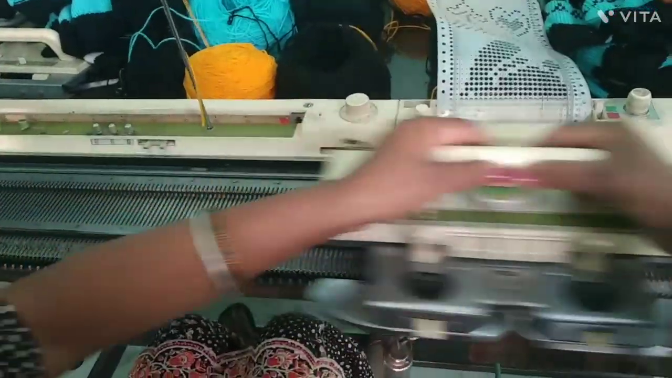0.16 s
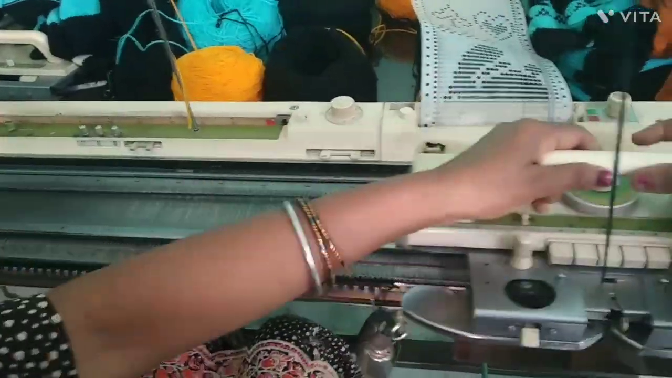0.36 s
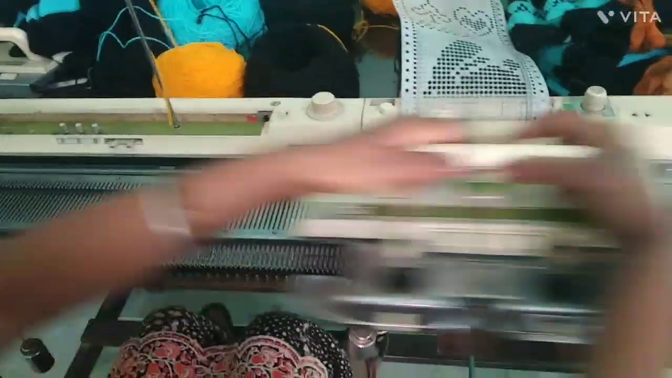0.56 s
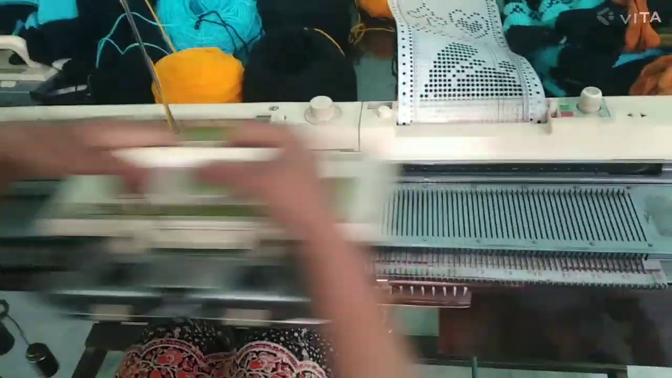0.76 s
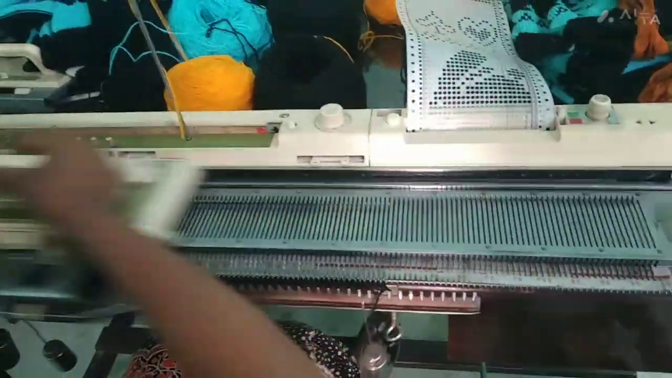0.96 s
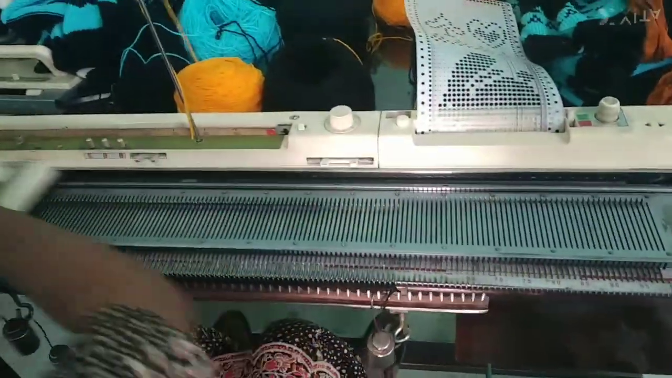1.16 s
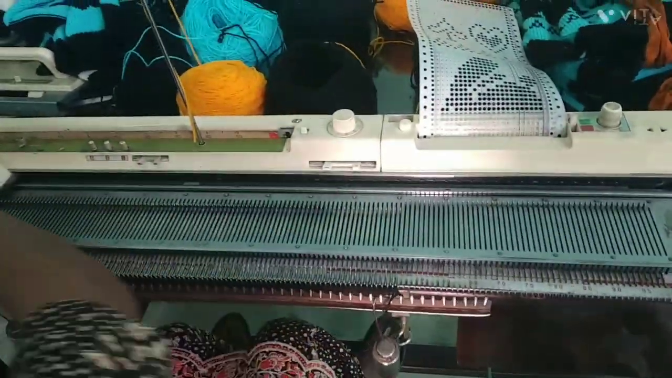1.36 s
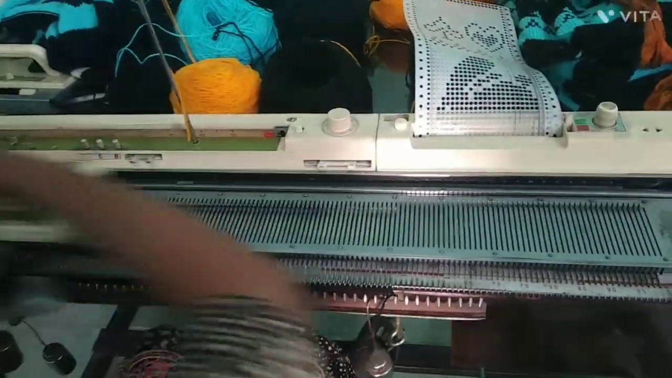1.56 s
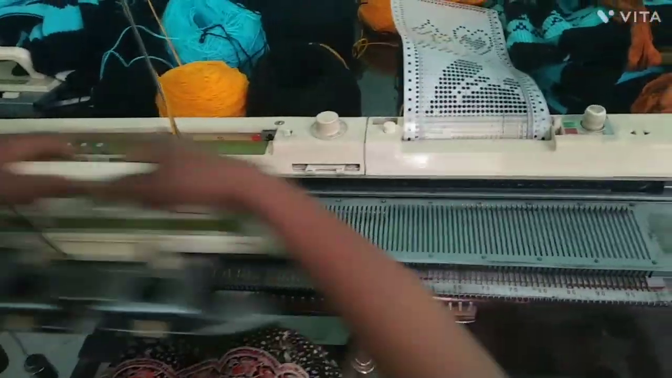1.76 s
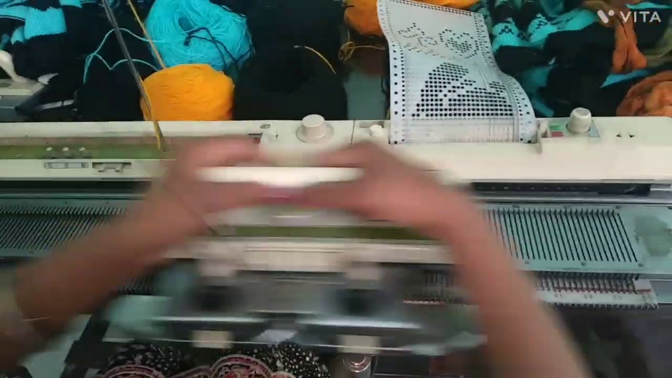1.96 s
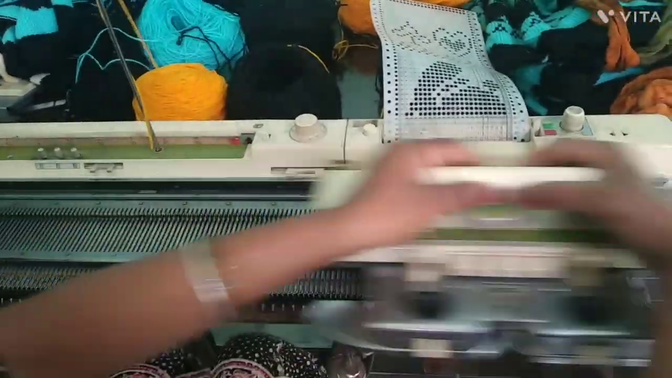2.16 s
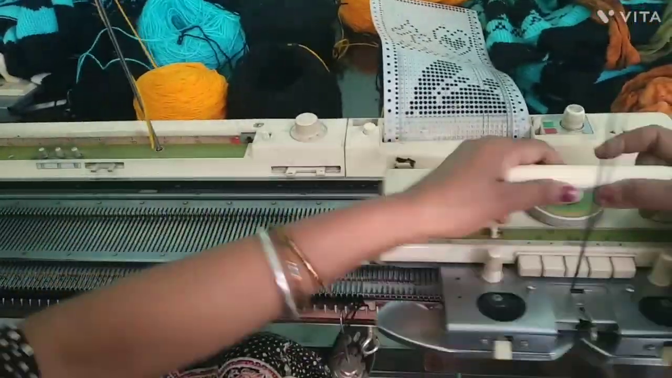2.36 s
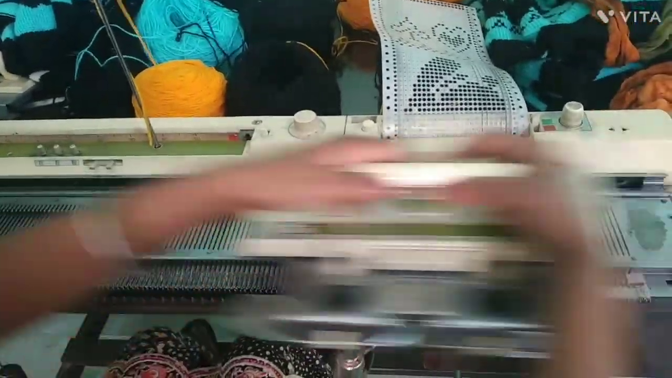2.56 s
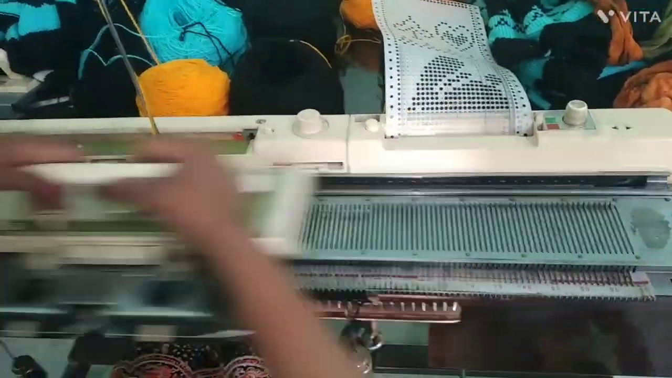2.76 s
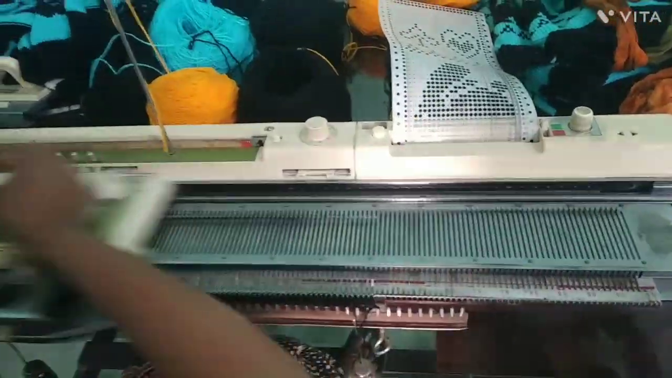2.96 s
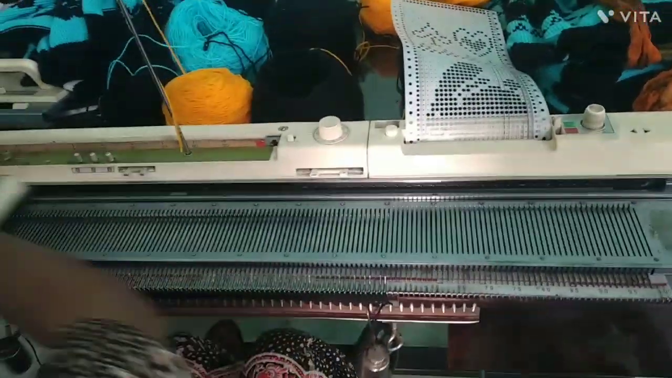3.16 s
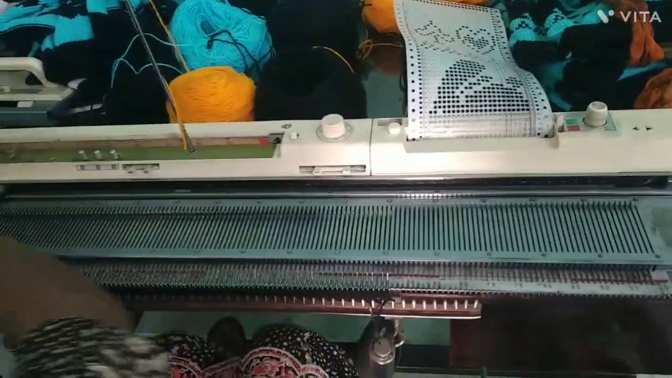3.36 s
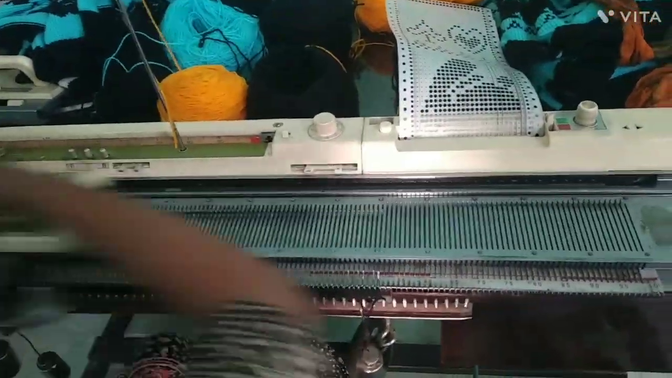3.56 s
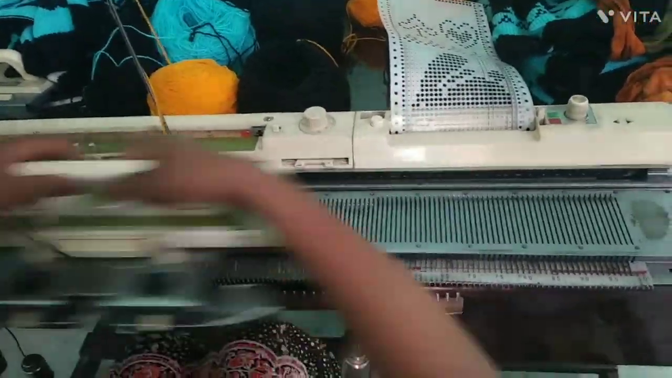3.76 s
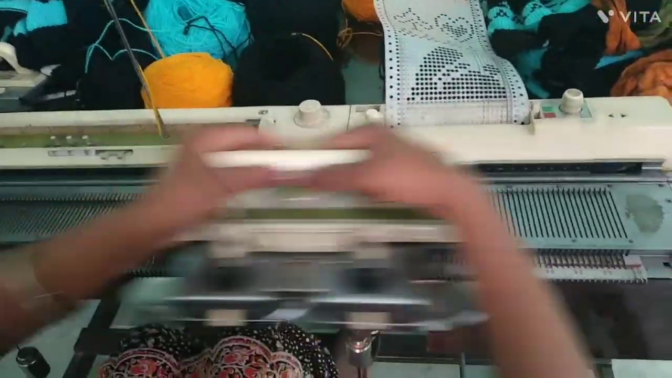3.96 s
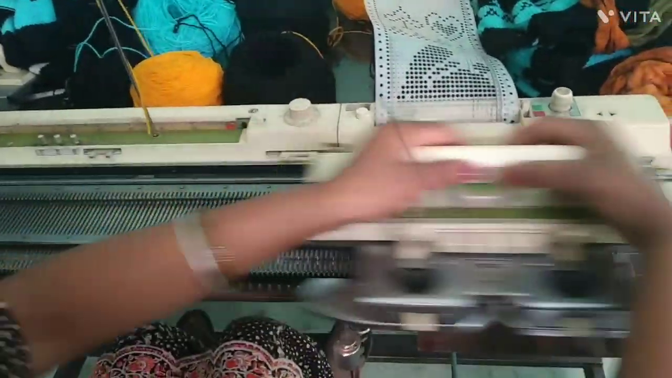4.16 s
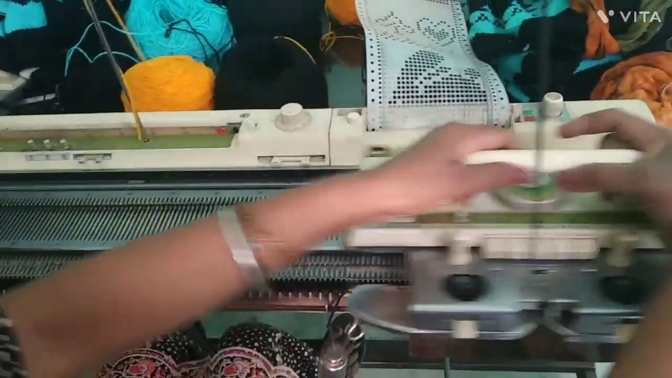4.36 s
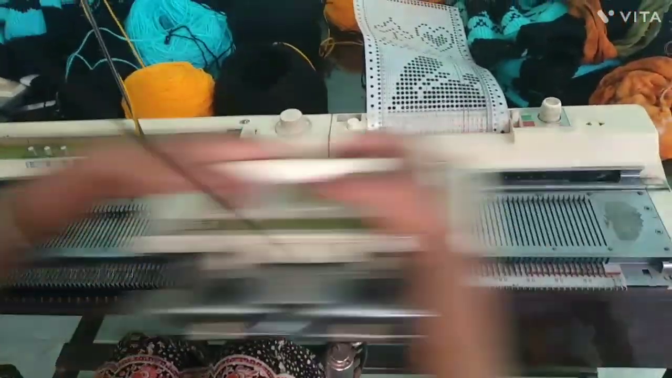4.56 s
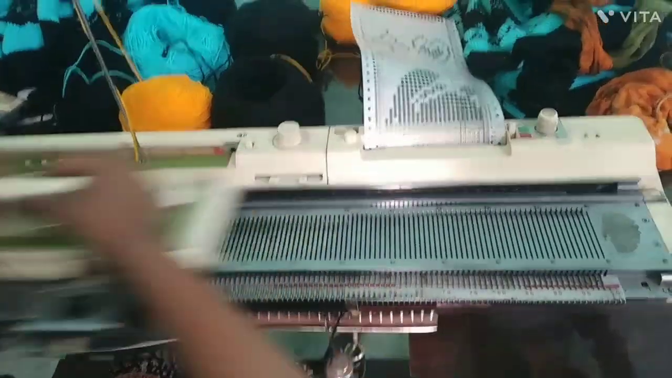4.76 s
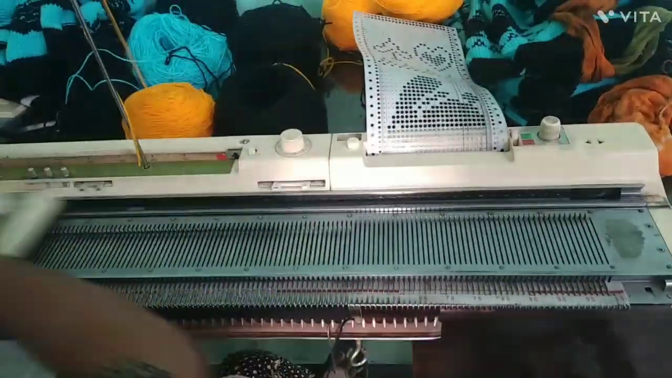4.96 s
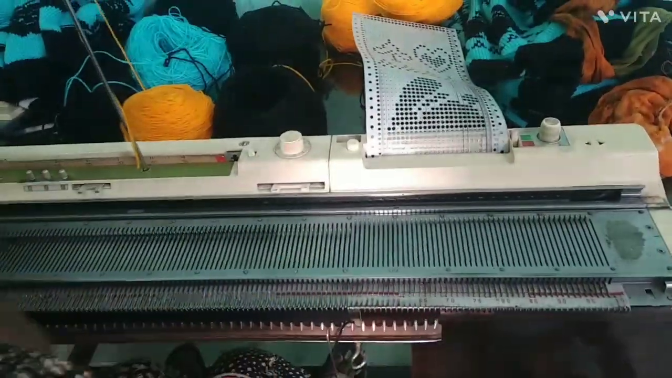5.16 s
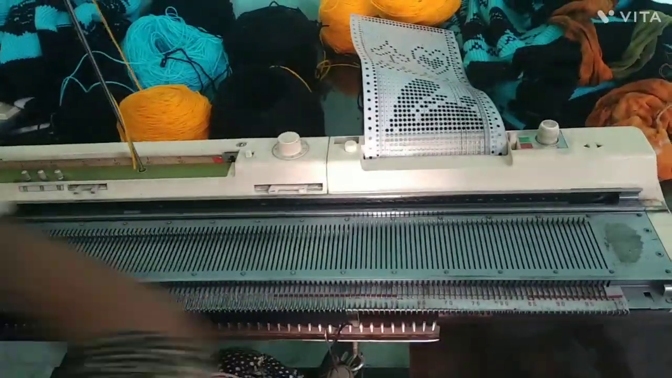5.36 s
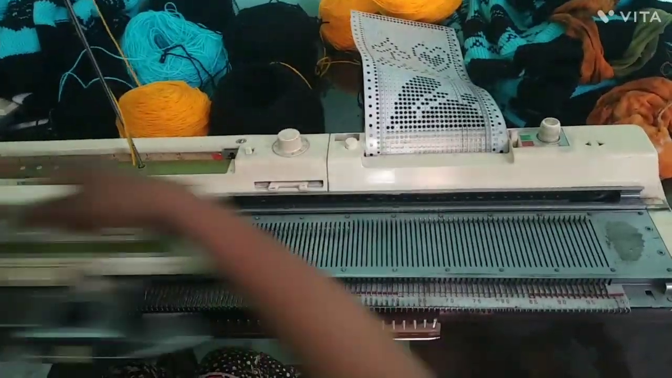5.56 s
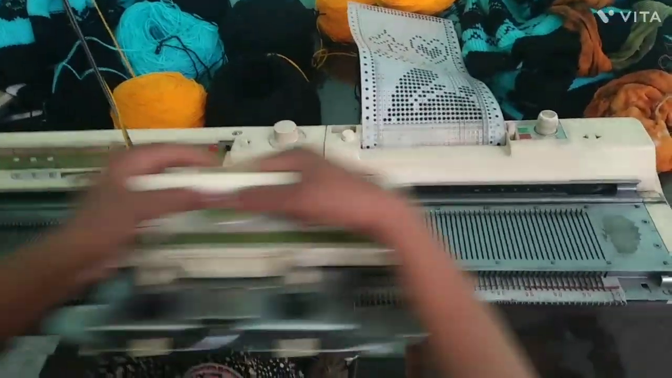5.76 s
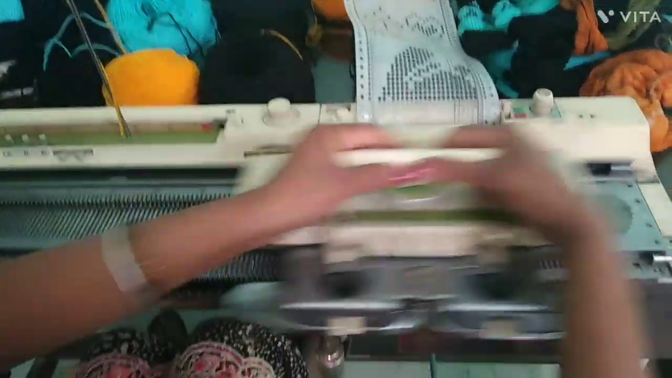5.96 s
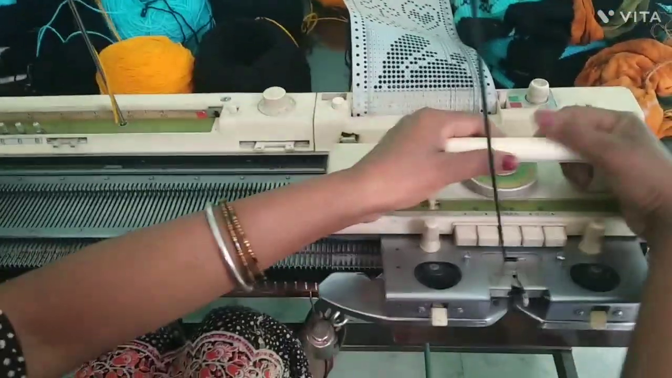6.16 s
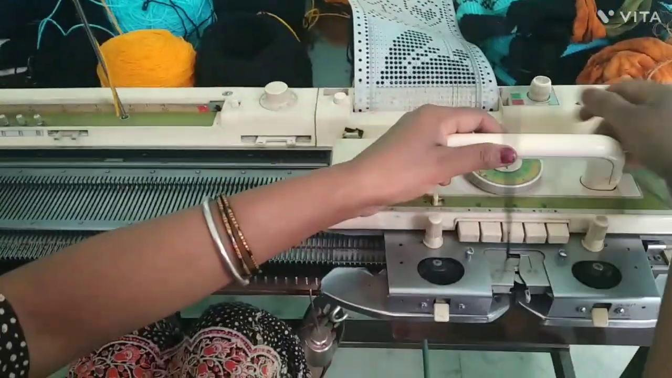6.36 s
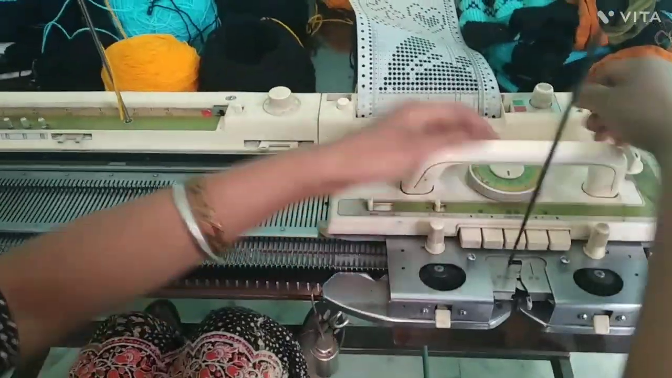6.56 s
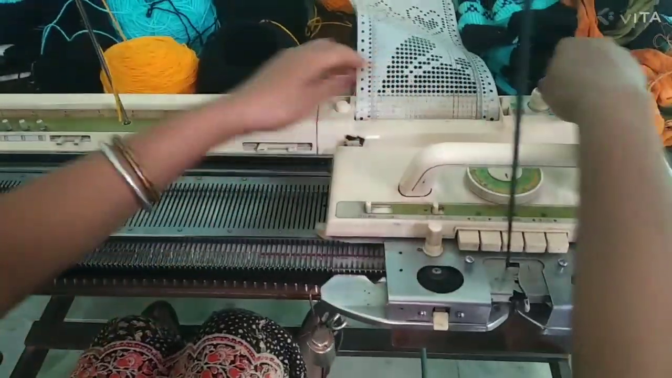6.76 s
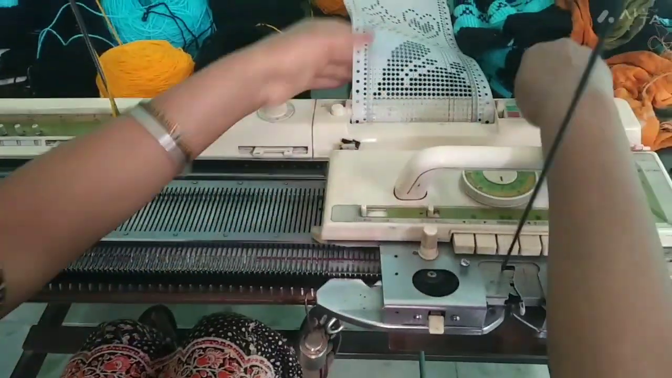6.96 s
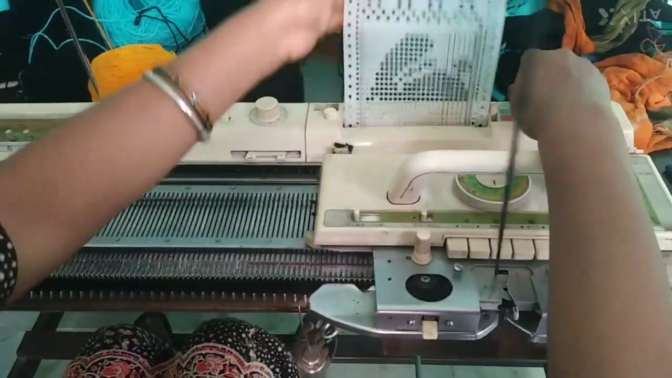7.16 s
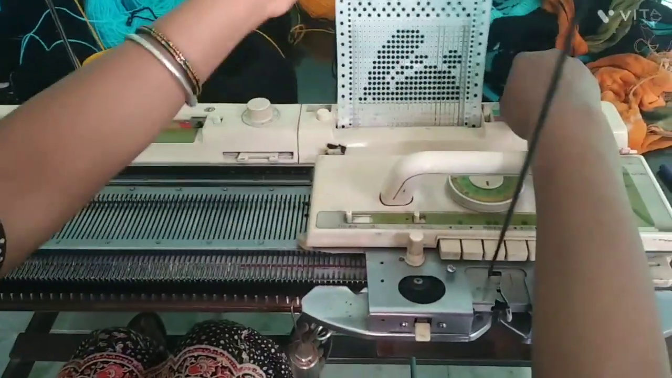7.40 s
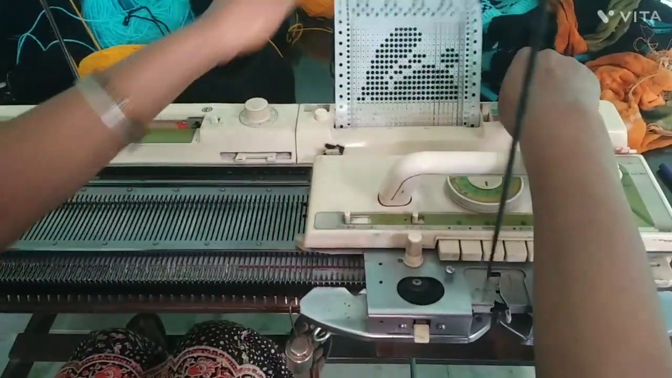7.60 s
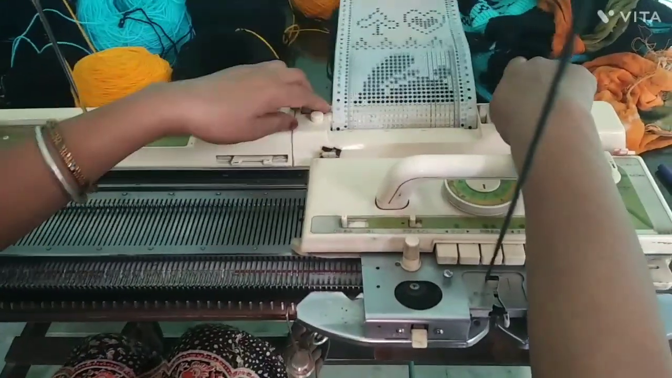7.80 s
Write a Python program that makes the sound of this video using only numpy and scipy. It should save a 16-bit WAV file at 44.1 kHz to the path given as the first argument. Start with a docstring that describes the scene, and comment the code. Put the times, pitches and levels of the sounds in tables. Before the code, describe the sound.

Seven rattling, hissing sweeps of a hand-pushed knitting machine, with lever clicks at the turns, then a faint rustle of card.

```python
"""A bright clicking hiss sweeps to and fro, over a rattle and a purr that sinks as each push slows.
It is a knitting machine in a small room: the cams of the hand-pushed carriage flick about 270 steel
needles a second. The blows shake the carriage plates and the bed; their even spacing makes the purr.
The table judders and levers click at the turns. Once the carriage rests, a soft hiss dies away after
a late click and the punched card is handled lightly."""
import sys
import numpy as np
from scipy import signal
from scipy.fft import rfft, irfft
from scipy.io import wavfile
from scipy.ndimage import uniform_filter1d

SR = 44100
rng = np.random.default_rng(int(sys.argv[2]) if len(sys.argv) > 2 else 0)


def wrap_up_sound(samples):
    """Save the sound to the file named by the first command line argument, as 16-bit audio."""
    columns = np.atleast_2d(samples).T
    # keep every value between -1 and 1, then stretch to whole-number steps
    tamed = np.clip(columns, -1, 1)
    steps = np.round(tamed * 32767).astype(np.int16)
    wavfile.write(sys.argv[1], SR, steps)


N = 345347
TIME = np.arange(N) / SR
CAM_RISE_S = .0048

# Pushes, right and left in turn. Each row: cam bite in seconds, creep before it in seconds; second cam,
# end of run-up and let-go in seconds after it; let-go softness in seconds; base force, creep force and
# purr offset in dB.
PUSHES = [(-.5, 0.025, .04, 0.072, 0.54, 0.042, -21.5, -60, 1),
          (.462, 0.071, .063, 0.091, .67, 0.045, -20, -43, 1),
          (1.552, .036, 0.13, 0.089, .55, 0.039, -20, -48, 1),
          (2.49, 0.05, 0.086, .12, 0.65, 0.065, -19, -43, 1),
          (3.545, .03, .059, 0.082, .6, .045, -19.5, -49, -0.5),
          (4.498, .04, 0.091, .1, .61, 0.039, -19.5, -42.5, 1.5),
          (5.507, .038, .032, .072, .54, .047, -19.5, -45, 1),
          (6.384, 0.046, 0.056, 0.089, .62, 0.055, -19.5, -41, 1.5)]


def gain_of(db):
    """Decibels to amplitude."""
    return 10 ** (np.asarray(db) / 20)


def unit_rms(x):
    """Scales to an rms of one."""
    return x / np.sqrt(np.mean(x ** 2) + 1e-20)


def lookup(points, hz):
    """Interpolates rows of (Hz, value) on a log-frequency axis."""
    f, value = np.transpose(points)
    return np.interp(np.log(hz + 1), np.log(f + 1), value)


def wander(rate_hz, hop=32):
    """Smooth random drift of unit rms, rolled off above rate_hz."""
    t = TIME[::hop]
    hz = np.fft.rfftfreq(len(t), hop / SR)
    slow = irfft(rfft(rng.standard_normal(len(t))) / (1 + (hz / rate_hz) ** 4), len(t))
    return unit_rms(np.interp(TIME, t, slow))


def coloured(x, spectrum, size=4096):
    """Minimum-phase filter of unit energy, shaped by rows of (Hz, dB)."""
    hz = abs(np.fft.fftfreq(size, 1 / SR))
    log_gain = np.log(gain_of(np.maximum(lookup(spectrum, hz), -100)))
    taps = np.fft.ifft(np.exp(np.conj(signal.hilbert(log_gain)))).real[:size // 2]
    return signal.oaconvolve(x, taps / np.linalg.norm(taps))[:N]


def swells(rows, height):
    """Sum of Gaussian bumps; `height` maps each row's dB to its peak."""
    return sum(height(db) * np.exp(-np.minimum(((TIME - centre_s) / width_s) ** 2, 50))
               for centre_s, db, width_s in rows)


def ringing(t60_s, ring_db):
    """Impulse response of a metal part: the blow, then dense, dying modes."""
    t = TIME[:SR // 6]
    modes = (rng.standard_normal(len(t)) * gain_of(-60 * t / t60_s))[t < t60_s]
    taps = gain_of(ring_db) * modes / np.linalg.norm(modes)
    taps[0] += 1
    return taps / np.linalg.norm(taps)


def along_bed(x, travel, response, count, group):
    """Each `group` needles sound from their own place: crossfades through `count` responses."""
    responses = [response() for _ in range(count)]
    place, out = travel / group, np.zeros(N)
    for k in range(int(place[-1]) + 2):
        a, b = np.searchsorted(place, [k - 1, k + 1])
        fade = np.sqrt(1 - abs(place[a:b] - k))
        part = signal.fftconvolve(x[a:b] * fade, responses[k % count])[:N - a]
        out[a:a + len(part)] += part
    return out


def stroke(leftward, speeds, bite_s, creep_s, cam_s, run_up_s, let_go_s, soft_s,
           base_db, creep_db, purr_offset_db):
    """One push: the carriage creeps as slack is taken up, the cams bite, it runs up, slides and coasts."""
    catch_db_per_s, release_db_per_s, purr_release_db_per_s = 1200, 177, 165.5
    usual_hz, force_db_per_octave, coast_decay_s = 280.75, 9, .21
    t = TIME - bite_s
    to_go = np.clip(1 - t / run_up_s, 0, 1)  # share of the run-up ahead
    slid = np.clip((t - run_up_s) / (let_go_s - run_up_s), 0, 1)  # share of the slide done
    coast_s = soft_s * np.logaddexp(0, (t - let_go_s) / soft_s)
    braking_s = np.maximum(TIME - speeds[-1][0], 0)
    pace_hz = np.interp(TIME, *np.transpose(speeds))
    speed_hz = pace_hz * (1 - .35 * to_go ** 2) * np.exp(-braking_s / coast_decay_s)

    before_bite_db = catch_db_per_s * np.maximum(-t, 0)
    one_cam_db = .5 * np.clip((cam_s - t) / CAM_RISE_S, 0, 1)  # weaker until the second cam engages
    pace_db = force_db_per_octave * np.log2(pace_hz / usual_hz)  # faster strikes harder
    drive_db = base_db + pace_db - one_cam_db - 17.5 * to_go ** 1.68
    slack_db = creep_db - catch_db_per_s * np.maximum(-t - creep_s, 0)
    force_db = np.maximum(drive_db - before_bite_db, slack_db) - release_db_per_s * coast_s

    # The purr sets in near full speed, builds, then sags along the slide.
    onset_db = before_bite_db + 50 * to_go + 6 * np.maximum(1 - slid / .22, 0)
    sag_db = 9 * slid + purr_release_db_per_s * coast_s
    purr_db = -45 + purr_offset_db - onset_db - sag_db
    leftness = slid if leftward else 1 - slid
    return np.array([force_db, speed_hz, leftness, purr_db])


def carriage_motion():
    """Chains the pushes: each takes over once its force passes that of the last."""
    # One list per push. Each point: time in seconds, pace in needles per second.
    speeds = [
        [(0, 260), (.08, 224)],
        [(.55, 285), (.7, 262), (.8, 245), (.93, 236), (1.03, 217), (1.15, 184)],
        [(1.65, 353), (1.8, 296), (1.96, 267), (2.1, 247)],
        [(2.62, 295), (2.77, 261), (2.86, 266), (3.04, 220), (3.16, 183)],
        [(3.66, 322), (3.84, 260), (3.93, 244), (4.07, 235), (4.14, 211)],
        [(4.6, 302), (4.74, 267), (4.89, 253), (4.98, 260), (5.07, 228), (5.15, 213)],
        [(5.61, 354), (5.72, 315), (5.8, 294), (5.87, 260), (5.97, 264), (6.07, 234)],
        [(6.47, 316), (6.56, 306), (6.66, 254), (6.81, 252), (6.95, 220), (7.02, 217)],
    ]
    controls = stroke(False, speeds[0], *PUSHES[0])
    for k in range(1, len(PUSHES)):
        new = stroke(k % 2 == 1, speeds[k], *PUSHES[k])
        controls = np.where(new[0] > controls[0], new, controls)
    return controls


def snags():
    """Force change in dB where the cams catch on tight needles: a quick rise that eases off."""
    # Each row: start in seconds, force change in dB, easing time in seconds.
    catches = [(.165, 9.5, 0.023), (.405, 3, 0.012), (1.16, 4.5, 0.029), (1.62, -0.5, 0.055),
               (2.49, 6.5, 0.013), (3.16, 6, 0.15), (3.645, 2, 0.023), (4.2, 7, 0.015)]
    return sum(db * np.clip((TIME - start_s) / CAM_RISE_S, 0, 1) * np.exp(-abs(TIME - start_s) / ease_s)
               for start_s, db, ease_s in catches)


def needle_blows(travel, scatter_s, uneven_db, scrape_db, cams=5):
    """Each needle meets several cams, a little early or late; between blows the carriage scrapes."""
    blows = np.zeros(N)
    for cam_offset in rng.random(cams):
        at = np.flatnonzero(np.diff(np.floor(travel + cam_offset)))
        late, force = rng.standard_normal((len(at), 2)).T
        at = np.clip(at + np.round(late * scatter_s * SR).astype(int), 0, N - 1)
        np.add.at(blows, at, gain_of(uneven_db * np.minimum(force, 1)) * rng.choice([-1, 1], len(at)))
    drive = unit_rms(blows) + gain_of(scrape_db) * rng.standard_normal(N)
    running_rms = np.sqrt(abs(uniform_filter1d(drive ** 2, size=4096)) + 1e-9)
    return drive / running_rms  # at low speed the scrape takes over


def needles(blows, travel, force_db):
    """Thin steel needles and latches ring briefly in the high treble; every few have their own colour."""
    # Each row: frequency in Hz, relative level in dB.
    steel_spectrum = [(2800, -40), (4500, -18), (5600, -13.5), (7000, -9), (8700, -5.8), (9600, -1.6),
                      (11000, 0), (12000, -1.4), (14000, -5.7), (15700, -10.5)]
    rings = along_bed(blows, travel, lambda: ringing(t60_s=.016, ring_db=4.5), count=200, group=3)
    return unit_rms(coloured(rings, steel_spectrum)) * gain_of(force_db - 1 + .43 * wander(22))


def rattle_drive(force_db, leftness):
    """Rattle gain in dB: rises with force, at mid-bed where the bed gives most, and as the hands lean."""
    # Hands leaning on the carriage. Each row: centre in seconds, rattle change in dB, width in seconds.
    leans = [(.69, 3, .06), (1.79, 0, .06), (2.62, 0.5, .035), (5.76, -0.5, .06)]
    return .77 * (force_db + 17) + .5 * np.sin(np.pi * leftness) + swells(leans, float)


def carriage_plates(blows, travel, level_db):
    """The needle blows rattle the plates and cover of the carriage."""
    # Each row: frequency in Hz, relative level in dB.
    plate_spectrum = [(250, -29.5), (400, -6), (600, -8.5), (760, -1), (1100, -2), (1400, -2.5), (1900, -5),
                      (2400, -2), (2850, -1), (3600, -5.5), (4500, -9), (5400, -2), (7000, -37),
                      (11000, -54.5)]
    rings = along_bed(blows, travel, lambda: ringing(t60_s=.028, ring_db=9.5), count=150, group=4)
    return unit_rms(coloured(rings, plate_spectrum)) * gain_of(level_db + .4 * wander(30))


def treble_chatter(travel, tone_db, low_hz=2700, high_hz=6900, t60_s=.12, max_onsets=2400, tones=2):
    """Brief tones at random treble pitches: a metallic shimmer that follows the rattle."""
    t = TIME[:SR // 8]
    decay = gain_of(-60 * t / t60_s)
    out = np.zeros(N + len(t))
    onsets = np.flatnonzero(np.diff(np.floor(travel)))
    pitches_hz = rng.uniform(low_hz, high_hz, (max_onsets, tones, 1))
    for at, hz in zip(onsets, pitches_hz):
        out[at:at + len(t)] += gain_of(tone_db[at]) * decay * np.sin(2 * np.pi * hz * t).sum(0)
    return out[:N]


def bed_rumble(blows, level_db):
    """The long bed and its table rumble in a few low resonances."""
    # Each row: frequency in Hz, relative level in dB.
    bed_spectrum = [(30, -35), (70, -11), (100, -4.5), (128, 3.5), (155, -4), (185, 1.5), (230, -2.5),
                    (290, 1.5), (380, -1.5), (480, -10.5), (650, -5), (1100, -47)]
    return unit_rms(coloured(blows, bed_spectrum)) * gain_of(level_db)


def purr(travel, speed_hz, level_db):
    """Evenly spaced needles give a tone that follows the speed; harmonics swell at frame resonances."""
    # Response of the frame. Each row: frequency in Hz, gain in dB.
    frame_response = [(80, 0), (130, 2), (180, 0), (220, -4), (245, -6), (272, 3), (300, -3), (340, -7.5),
                      (430, -5), (540, -12), (650, -12), (790, -8.5), (880, -8), (960, -5.5), (1040, -3.5),
                      (1140, -6.5), (1400, -9.5), (1600, -16)]
    # Offsets in dB for harmonics 1 to 5 of the needle rate.
    harmonics_db = [0, 0, -2.5, 0, -2.5]
    # Whine of harmonics 3 to 5. Each row: centre in seconds, base level in dB, width in seconds.
    whines = [(.03, -41, .06), (.89, -39.5, .09), (1.06, -40, .06), (1.8, -38.5, .1), (2.01, -40, .1),
              (2.84, -39, .12), (3.08, -38.5, .055), (3.86, -37, .11), (4.04, -39, .08), (4.76, -41.5, .09),
              (4.98, -43, .07), (5.67, -39.5, .07), (5.84, -38.5, .12), (6.63, -39.5, .06),
              (6.81, -42, .08)]
    purr_gain, whine_gain = gain_of(level_db), swells(whines, gain_of)
    cycles = travel + .035 * wander(20)
    tone = np.zeros(N)
    for k, harmonic_db in enumerate(harmonics_db, 1):
        phase = k * cycles + .014 * k * wander(60)  # upper harmonics are rougher
        gain = gain_of(harmonic_db + lookup(frame_response, k * speed_hz) + 3 * wander(30))
        tone += gain * (purr_gain if k < 3 else whine_gain) * np.cos(2 * np.pi * phase)
    return tone * np.clip(speed_hz / 200, 0, 1) ** 3  # a slow carriage hardly sings


def table_judders():
    """The table judders as the carriage runs off the last needles, and less as it turns round."""
    # Each row: centre in seconds, level in dB, width in seconds.
    judders = [(0.079, -53, 0.047), (0.409, -77, 0.042), (1.17, -46.5, 0.054), (2.14, -43, 0.047),
               (2.44, -58.5, 0.029), (3.15, -47, 0.1), (4.165, -42.5, 0.049), (4.41, -57, 0.049),
               (5.15, -50.5, 0.092), (6.075, -44.5, 0.05), (6.33, -59, 0.038), (7.01, -49, 0.054)]
    spectrum_hz_db = [(80, -41), (125, -5.5), (165, .5), (210, -6), (280, -13.5), (420, -13), (800, -57)]
    return swells(judders, gain_of) * coloured(rng.standard_normal(N), spectrum_hz_db)


def table_boom(jolts, slide_db, jolt_db, hz, t60_s):
    """One low mode of the table, fed by sliding and jolts, hums on as the carriage slows."""
    t = TIME[:SR]
    mode = np.sin(2 * np.pi * hz * t) * gain_of(-60 * t / t60_s)
    drive = gain_of(slide_db) * rng.standard_normal(N) + gain_of(jolt_db) * jolts
    return signal.oaconvolve(drive, mode / np.linalg.norm(mode))[:N]


def clicks_and_ticks(rise_s=.0016, decay_s=.003):
    """Levers chatter as they snap over, and a few single needles tick as the carriage slows; each gives a
    bright ring and a dull knock in the frame."""
    # Each row: start in seconds, ring and knock in relative dB.
    snaps = [(0.334, -34, -60), (.375, -39, -55), (1.512, -36, -51), (2.42, -34.5, -60), (2.43, -29, -56.5),
             (3.457, -40.5, -67), (3.464, -38, -67), (3.497, -44, -53), (3.521, -34.5, -52),
             (4.406, -36, -68), (4.411, -35, -58), (4.442, -38, -57), (4.452, -25.5, -59.5),
             (5.379, -37, -59), (5.466, -42.5, -56), (5.488, -35, -52), (6.267, -37, -65),
             (6.277, -35, -62), (6.303, -32, -60), (6.312, -26.5, -55.5), (6.334, -24.5, -53),
             (7.4, -48.5, -42.5), (7.815, -44, -59)]
    # Each row of both spectra: frequency in Hz, relative level in dB.
    ring_spectrum = [(1000, -35), (3000, -25), (6000, -8), (9000, -2), (11000, 3), (13000, -2), (16000, -9)]
    knock_spectrum = [(40, -11), (130, 2.5), (300, 0), (600, 0), (1500, -1), (2100, 10), (2700, 5),
                      (3300, 8), (4400, 2), (5500, 10), (6600, -8), (14000, -6)]
    t = TIME[:SR // 20]
    envelope = np.minimum(t / rise_s, 1) * np.exp(-t / decay_s)
    bright, dull = np.zeros((2, N + len(t)))
    for start_s, ring_db, knock_db in snaps:
        chatter = envelope * rng.standard_normal(len(t))
        chatter /= np.linalg.norm(chatter)
        at = round(start_s * SR)
        bright[at:at + len(t)] += gain_of(ring_db) * chatter
        dull[at:at + len(t)] += gain_of(knock_db) * chatter
    clicks = coloured(bright, ring_spectrum) + coloured(dull, knock_spectrum)
    return gain_of(13) * signal.oaconvolve(clicks, ringing(t60_s=.16, ring_db=-7))[:N]


def noise_bursts(rows, spectrum, rise_s=.0077):
    """Coloured noise in bursts that start quickly and die away."""
    envelope = np.zeros(N)
    for start_s, db, decay_s in rows:
        t = TIME - start_s
        envelope += gain_of(db) * np.clip(t / rise_s, 0, 1) * np.exp(-abs(t) / decay_s)
    return envelope * coloured(rng.standard_normal(N), spectrum)


def soft_hiss():
    """A soft hiss dies away after the late click, then a faint rustle follows."""
    # Each row: start in seconds, level in dB, decay time in seconds.
    bursts = [(7.398, -67, 0.16), (7.768, -68, 0.12)]
    # Each row: frequency in Hz, relative level in dB.
    hiss_spectrum = [(200, 12), (1000, 13), (1450, 4), (2000, 4.5), (2600, 6), (3500, 8), (5600, 4),
                     (6600, 3), (11000, 15.5), (15000, -7)]
    return noise_bursts(bursts, hiss_spectrum)


def card_rustles():
    """The punched pattern card rustles as a hand turns it."""
    # Each row: start in seconds, level in dB, decay time in seconds.
    rustles = [(7.49, -68, 0.017), (7.562, -66.5, 0.021), (7.79, -69, .05)]
    # Each row: frequency in Hz, relative level in dB.
    card_spectrum = [(200, -7.5), (700, -2), (1200, -2), (1700, -11), (2400, -13), (7000, -17),
                     (14000, -22)]
    return noise_bursts(rustles, card_spectrum)


def room_air(level_db):
    """Still air of the room: faint, steady, mostly low noise."""
    # Each row: frequency in Hz, relative level in dB.
    air_spectrum = [(20, 6), (45, 15), (100, 2), (250, -12.5), (600, -28), (2000, -27.5), (10000, -19.5),
                    (16000, -36)]
    return gain_of(level_db) * coloured(rng.standard_normal(N), air_spectrum)


def room_tail():
    """Diffuse room response of unit energy; the treble dies first."""
    # Each row: frequency in Hz, T60 in seconds.
    decay_times = [(125, 0.93), (500, 0.75), (1000, 0.68), (2000, 0.61), (6000, 0.41), (11000, 0.29),
                   (16000, 0.18)]
    hz, t, noise = signal.stft(rng.standard_normal(SR // 2), SR, nperseg=256)
    decay = gain_of(-60 * t / lookup(decay_times, hz)[:, None])
    taps = signal.istft(noise * decay, SR)[1]
    return taps / np.linalg.norm(taps)


def scene():
    """The machine in its room, the same in both channels."""
    stroke_db, speed_hz, leftness, purr_db = carriage_motion()
    push_db = stroke_db + snags()
    held = TIME < PUSHES[-1][0]
    force_db = np.where(held, np.maximum(push_db, -61.5), push_db)  # still rattles between pushes
    speed_hz = speed_hz * (1 + .007 * wander(9))  # hands never push quite evenly
    travel = np.cumsum(speed_hz) / SR  # needles passed
    rattle_db = rattle_drive(force_db, leftness)
    bed_db = -52.5 + .36 * (push_db + 17) + (leftness - .5)  # 1 dB more at the left end than the right

    blows = needle_blows(travel, scatter_s=.0004, uneven_db=2.5, scrape_db=-2)
    rattle = carriage_plates(blows, travel, rattle_db - 38) + treble_chatter(travel, rattle_db - 39.3)
    clatter = needles(blows, travel, force_db) + rattle + bed_rumble(blows, bed_db)
    clatter += clicks_and_ticks() + soft_hiss() + card_rustles()
    tone = purr(travel, speed_hz, purr_db)
    jolts = table_judders()
    boom = table_boom(jolts, slide_db=bed_db - 10.5, jolt_db=-30, hz=128.9, t60_s=.32)
    air = room_air(level_db=-73.5)
    radiated = clatter + gain_of(1.5) * tone  # the whole frame radiates the purr
    reverb = along_bed(radiated, travel, room_tail, count=40, group=10)
    return np.tile(clatter + tone + jolts + boom + air + gain_of(-6) * reverb, (2, 1))


def record(dry):
    """Steep low-pass on the top of the treble."""
    edge_hz = 15750
    taps = signal.firwin(1501, edge_hz, window=("kaiser", 9), fs=SR)
    return signal.oaconvolve(dry, taps[None], "same")


dry = scene()
out = record(dry)
wrap_up_sound(out)
```